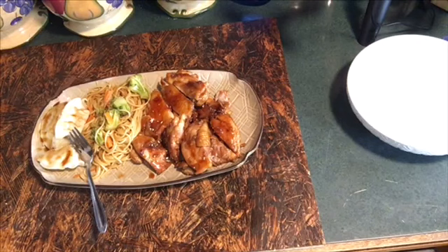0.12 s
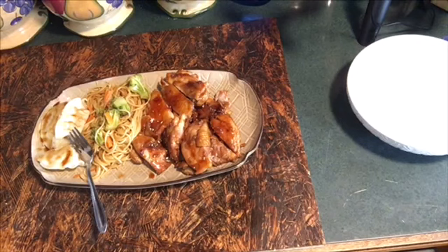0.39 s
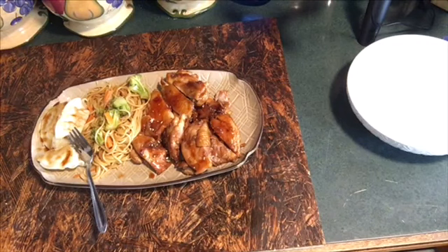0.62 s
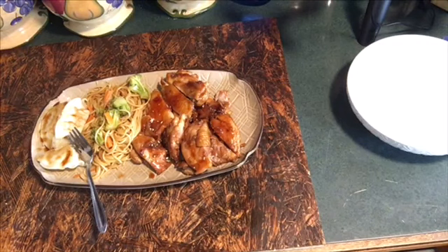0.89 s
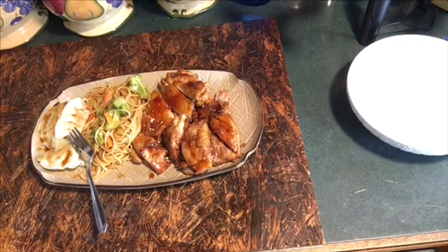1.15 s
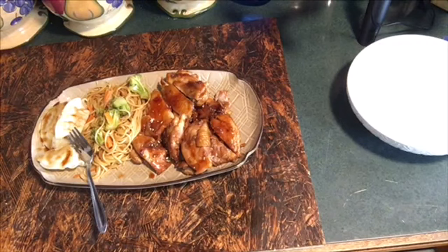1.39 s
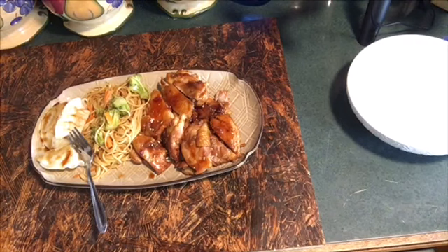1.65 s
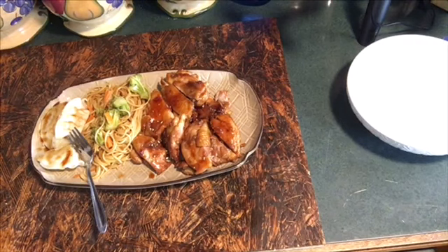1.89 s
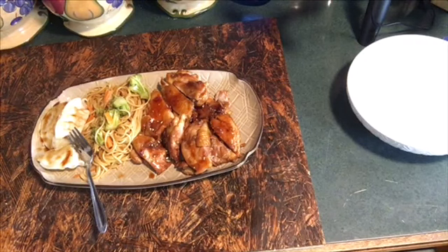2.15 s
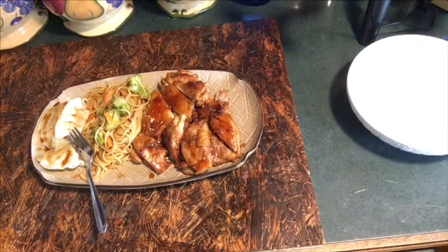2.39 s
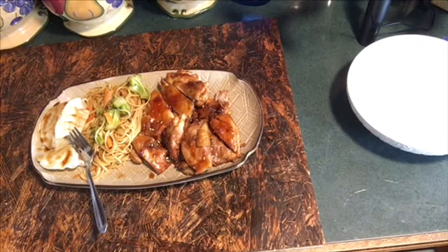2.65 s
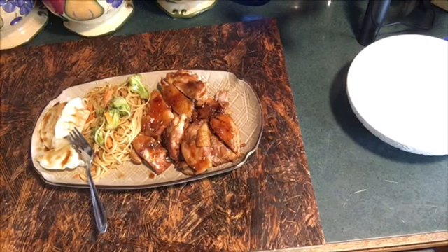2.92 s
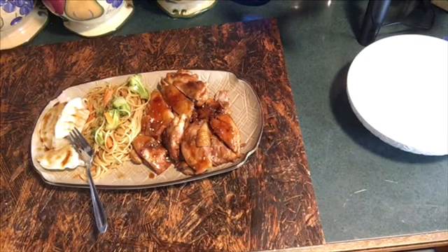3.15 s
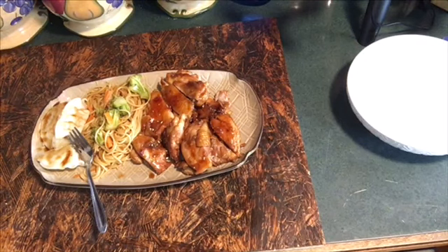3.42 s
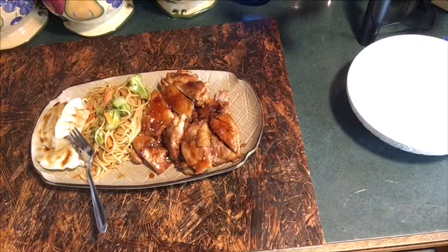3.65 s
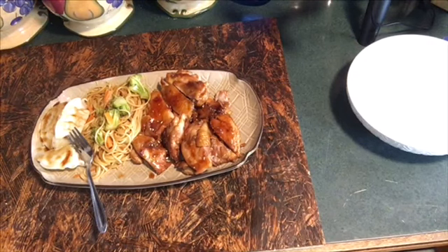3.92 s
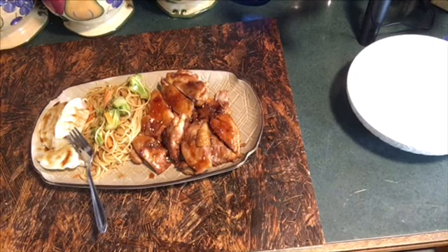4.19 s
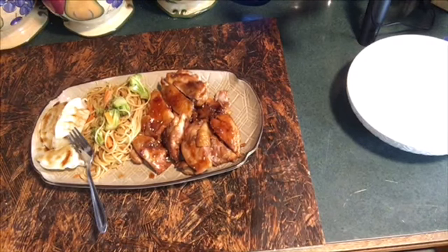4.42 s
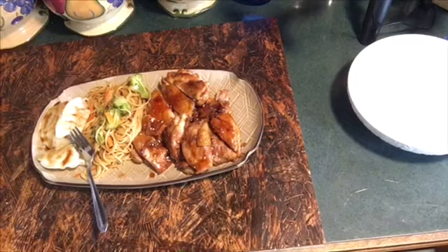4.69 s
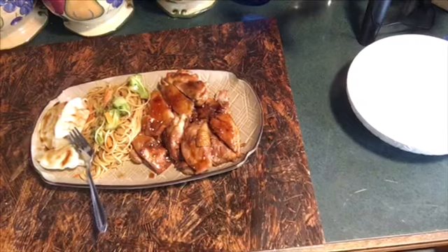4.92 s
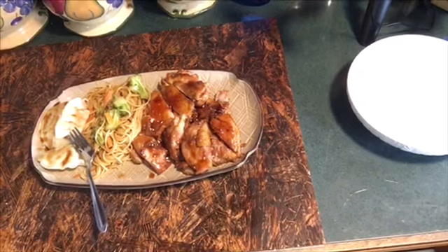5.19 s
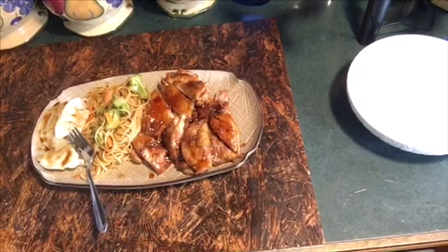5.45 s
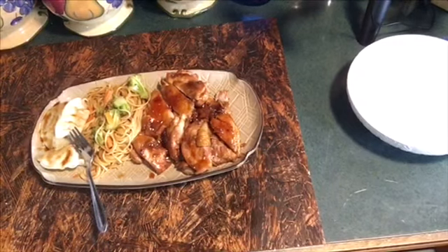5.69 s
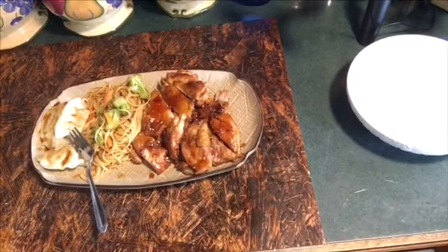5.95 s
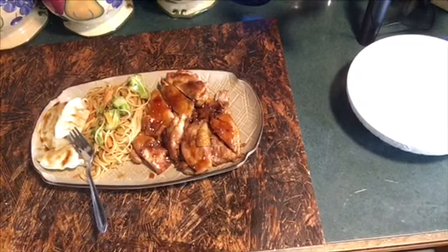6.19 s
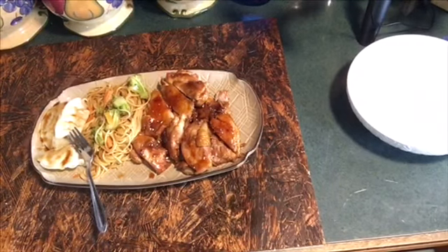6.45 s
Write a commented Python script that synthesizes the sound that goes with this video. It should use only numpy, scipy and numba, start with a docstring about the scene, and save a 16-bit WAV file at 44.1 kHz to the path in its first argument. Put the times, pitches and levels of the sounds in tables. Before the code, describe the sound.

In a small hard kitchen, a faint fridge hum and hiss continue throughout. Dry knocks and grainy slides on a wooden shelf grow busier, then a dish lands with a bright ceramic clack and rattle. After a short lull cutlery jingles and a drawer slams, the loudest moment, followed by bumps and another knock. Cloth softly rustles, a pot scrapes briefly and glass clinks. Heard by a phone a few steps away.

```python
"""Someone rummages in a kitchen cupboard a few steps from a phone, over the hum of a fridge. Knocks and
slides come first, with a faint clink of glass; then a dish is set down, cutlery jingles and a drawer slams.
Cloth rustles, a pot scrapes and the glass clinks again. Knocks are shaped bursts of noise, slides are
filtered grainy noise, and struck things are fading tones. A small hard room rings after each contact."""
import sys
import numpy as np
from scipy import signal
from scipy.fft import rfft, irfft
from scipy.io import wavfile
from scipy.ndimage import uniform_filter1d
from numba import njit

SR = 44100
rng = np.random.default_rng(int(sys.argv[2]) if len(sys.argv) > 2 else 0)


def master(y):
    """Save y as 16-bit WAV."""
    cut = np.clip(np.atleast_2d(y).T, -1, 1)
    pcm = np.round(cut * 32767)  # scale
    wavfile.write(sys.argv[1], SR, pcm.astype(np.int16))


def volts_from_decibels(level):
    """Turn decibel levels (scalar or array-like) into linear amplitude factors."""
    exponent = np.asarray(level, float) / 20
    return 10 ** exponent


N = 290178

# a hand shifting things about the shelf: (time [s], level [dB])
RUMMAGE = [(.45, -71), (1.1, -68.5), (1.3, -55), (1.47, -59.5), (1.68, -52), (1.83, -58.5), (2.05, -55.5),
           (2.46, -49), (2.5, -34.5), (2.6, -42.5), (2.75, -72)]


@njit
def svf(x, hz, sharp):
    """State-variable band-pass: lets through sound around hz, which may move, with gain 1 there."""
    y, b, l = np.empty(len(x)), 0., 0.
    for i in range(len(x)):
        g = np.tan(np.pi * hz[i] / SR)
        v = (b + g * (x[i] - l)) / (1 + g * (g + 1 / sharp))
        b, l, y[i] = 2 * v - b, l + 2 * g * v, v / sharp
    return y


def add(track, s, sound):
    """Mix a sound into the track from time s."""
    i = int(s * SR)
    track[i:i + len(sound)] += sound[:N - i]


def walk(rate):
    """A random level that slides to a new value rate times a second; its spread is near 1."""
    k = int(SR / rate)
    held = np.repeat(rng.standard_normal(N // k + 1), k)
    return 1.2 * uniform_filter1d(held, k)[:N]


def rattles(rows):
    """Short bursts of contact noise, coloured by a broad ring with chance modes, a dull body and treble."""
    contact_s, swell = 0.01261, 0.44  # fade time constant; rise time as a share of it
    sharp, mode_sharp = 1.218, 14
    out, t = np.zeros(N), np.arange(8192) / SR
    f = np.arange(4097) * SR / 8192 + 1  # Hz, kept above zero
    noises = rng.standard_normal((len(rows), 8192))
    spreads = rng.standard_normal((len(rows), 6, 1))
    for (s, db, hz, treble_db), noise, spread in zip(rows, noises, spreads):
        broad = 1 / np.hypot(1, sharp * (f / hz - hz / f)) ** 2.01
        mode_hz = hz * 2 ** (spread / 2)
        modes = 1 / (1 + 1j * mode_sharp * (f / mode_hz - mode_hz / f))
        ringing = broad * (1 + modes.sum(axis=0))
        body = volts_from_decibels(-5) / (1 + (f / 2000) ** 2.706) * f / np.hypot(f, 250)
        treble = volts_from_decibels(treble_db) * f / np.hypot(f, 4000) / (1 + (f / 7000) ** 3)
        rattle = noise * np.exp(-t / contact_s) * (1 - np.exp(-t / (swell * contact_s)))
        # roll lets the filter's short lead-in stay ahead of the contact
        sound = np.roll(irfft(rfft(rattle) * (ringing + body + treble)), 64)[:6000]
        add(out, s - 64 / SR, sound * volts_from_decibels(db) / np.abs(sound).max())
    return out


def thuds(rows, t60, rise, rough_db, jolt=0., shake_hz=100):
    """Each blow leaves one fading tone, shaken shake_hz times a second by the loose things on it."""
    out, t = np.zeros(N), np.arange(SR // 2) / SR
    chances = rng.standard_normal((len(rows), 50))
    for (s, db, hz), fade, chance in zip(rows, np.broadcast_to(t60, len(rows)), chances):
        shake = np.interp(t * shake_hz, np.arange(50), chance)
        slip = np.interp(t * shake_hz, np.arange(50), chance[::-1])
        level = volts_from_decibels(db + rough_db * shake - 60 * t / fade) * (1 - np.exp(-t / rise))
        add(out, s, level * np.sin(2 * np.pi * hz * t + jolt * slip))
    return out


def harder_is_brighter(blows, tilt_db, slope):
    """Tilt each blow in dB per octave: tilt_db for a medium blow of -40 dB, plus slope per dB of force."""
    return [(s, db, tilt_db + slope * (db + 40)) for s, db in blows]


def ring_modes(modes_hz, modes, blows, main_hz, rise, scatter_db, chatter_db, jolt, clatter_db):
    """Every blow sets all modes going, each a little differently; loose contact makes them flicker and blur."""
    out, t = np.zeros(N), np.arange(SR // 4) / SR
    hz = np.array(modes_hz)[:, None]
    mode_db, t60 = np.transpose(modes)[:, :, None]

    def wobble(part):
        return np.array([np.interp(t * 180, np.arange(60), c) for c in part])

    chances = rng.standard_normal((len(blows), len(modes), 122))
    for (s, db, tilt_db), chance in zip(blows, chances):
        start_db = db + mode_db + tilt_db * np.log2(hz / main_hz) + scatter_db * chance[:, :1]
        flicker, slip = wobble(chance[:, 2:62]), wobble(chance[:, 62:])
        phase = 2 * np.pi * hz * t + 9 * chance[:, 1:2] + jolt * slip
        tones = volts_from_decibels(start_db + chatter_db * flicker - 60 * t / t60) * np.sin(phase)
        # bright grit of edges rubbing fills in between the modes
        grit = np.diff(rng.standard_normal(len(t) + 1))
        clatter = volts_from_decibels(db + tilt_db + clatter_db - 60 * t / 0.086) * grit
        add(out, s, (tones.sum(axis=0) + clatter) * (1 - np.exp(-t / rise)))
    return out


def hush():
    """Fridge rumble and hiss of an empty room: shaped noise whose level wavers slightly."""
    # spectrum of the hush: (pitch [Hz], relative level per Hz [dB])
    spectrum = [(15, -49), (25, -12), (40, -7), (59, -2), (76, -2), (87, -12), (185, -16.5), (309, -17.5),
                (476, -24.5), (545, -22), (677, -24), (1940, -28.5), (2160, -29.5), (4030, -32.5),
                (16000, -49.5)]
    hz, db = np.transpose(spectrum)
    bins = np.arange(N // 2 + 1) * SR / N + 1
    shape = volts_from_decibels(np.interp(np.log(bins), np.log(hz), db))
    noise = irfft(rfft(rng.standard_normal(N)) * shape, N)
    return noise * volts_from_decibels(-63 + 0.28 * walk(1.6)) / noise.std()


def knocks():
    """Dry contacts: each is a brief rattle with its own pitch and brightness."""
    # contacts: (time [s], level [dB], ring pitch [Hz], treble [dB])
    contacts = [(0.366, -49, 819, -14), (0.585, -45.5, 1505, -15.5), (0.707, -48.5, 814, -49.5),
                (0.758, -41, 916.5, -51), (0.818, -48, 773, -33), (0.888, -51, 634, -26),
                (1.098, -51, 1164, -10.5), (1.147, -42.5, 1168, -24.5), (1.243, -33, 1300, -15),
                (1.276, -37, 885.3, -35), (1.362, -46.5, 842, -28), (1.501, -41, 861.5, -3.5),
                (1.566, -38, 2740, -38.5), (1.59, -30.5, 1294, -14.5), (1.631, -33.5, 1014, -55.5),
                (1.645, -33.5, 660.3, -52), (1.7, -38, 1403, -27), (1.808, -54.5, 611, -40),
                (1.858, -38, 3002, -51.5), (1.878, -37.5, 1150, -46), (2.033, -46.5, 4006, -22),
                (2.077, -36, 2958, -28), (2.088, -35.5, 881.4, -31), (2.188, -39.5, 1067, -7),
                (2.268, -41.5, 1402, -12), (2.339, -37, 1022, -21.5), (2.413, -35, 675.5, -41),
                (2.452, -33, 900.2, -50), (2.482, -18, 1700, -4), (2.568, -28, 1968, -13),
                (2.938, -52.5, 1896, -26.5), (3.496, -54, 2355, -36.5), (3.643, -41, 2940, 28.5),
                (3.954, -35.5, 1940, -3.5), (4.073, -40, 2468, -11), (4.112, -14, 227.5, -40.5),
                (4.114, -10, 1001, -6.5), (4.148, -19.5, 629.5, -20), (4.34, -41, 850, -10.5),
                (4.38, -41, 919.5, -48.5), (4.453, -38, 1326, -23), (4.486, -33, 1056, -10.5),
                (4.52, -43.5, 1520, -16), (4.727, -39, 2282, -15), (5.037, -25, 2200, -6),
                (5.051, -28.5, 1513, -22.5), (5.429, -51, 1626, -20.5), (5.539, -51, 1866, -32.5),
                (5.957, -54, 598, -36.5), (6.314, -39.5, 2010, -7), (6.479, -33, 3300, -20),
                (6.52, -32, 720, -13), (6.53, -27, 1900, -17.5)]
    return rattles(contacts)


def slide():
    """Grainy friction: dense small slips through a broad resonance, for the rummaging and single drags."""
    # single drags and rustles: (start [s], end [s], start level [dB], end level [dB], brightness [Hz])
    drags = [(1.235, 1.4, -48, -68.5, 2202), (1.582, 1.768, -46, -60, 2400), (3.5, 3.962, -63.5, -51, 2238),
             (3.954, 4.09, -37, -45, 1314), (4.297, 4.904, -48, -58.5, 1156)]
    t = np.arange(N) / SR
    out = np.zeros(N)
    slips = rng.standard_normal(N) * volts_from_decibels(4.1 * walk(60) + 2.777 * walk(400))
    # the shelf underneath drones along, more under dull heavy things than bright light ones
    wood = svf(slips[::-1].copy(), np.full(N, 300.), 1.23)
    moves = [(*np.transpose(RUMMAGE), 1150)]
    moves += [((s0, s1), (db0, db1), hz) for s0, s1, db0, db1, hz in drags]
    for s, db, hz in moves:
        fade = np.clip(np.minimum(t - s[0], s[-1] + .05 - t) / .03, 0, 1)
        centre = np.full(N, 1. * hz)
        rub = svf(svf(slips, centre, 0.975), centre, 0.975)
        out += fade * volts_from_decibels(np.interp(t, s, db)) * (rub + (2000 / hz) ** 2 * wood)
    return out


def jostles():
    """Small things knocked at random moments, with a force that follows the rummaging hand."""
    count, low_hz, octaves, treble_db = 70, 398, 3.0065, -30
    s, db = np.transpose(RUMMAGE)
    when, pitch, force = rng.random((count, 3)).T
    at = s[0] + when * (s[-1] - s[0])
    # most stay near the hand's level, a few are much louder
    level_db = np.interp(at, s, db) + 3.5 + 2 * np.log(1 / (1 - force))
    return rattles([(a, d, low_hz * 2 ** (octaves * p), treble_db) for a, d, p in zip(at, level_db, pitch)])


def wooden_tones(rows):
    """Wood answers each blow with a short, slightly unsteady tone."""
    return thuds(rows, 0.0954, rise=0.003, rough_db=3.5, jolt=.6)


def shelf():
    """The cupboard shelf: where it is struck favours its low or its high modes."""
    # modes of the shelf: (pitch [Hz], relative level [dB])
    modes = [(257, -1.5), (290, -2.5), (388, -2)]
    # blows on it: (time [s], level [dB], tilt [dB per octave])
    blows = [(0.524, -49.5, 8), (0.628, -51, 0.5), (0.697, -54, 0.5), (0.76, -42.5, 0),
             (0.825, -51.5, 20.5), (0.901, -43.5, -17), (1.144, -46.5, 13.5), (1.247, -45, 11.5),
             (1.28, -36.5, 8), (1.312, -40, -1.5), (1.336, -41.5, 10.5), (1.375, -43, -3),
             (1.418, -45.5, -3), (1.499, -44, -21.5), (1.545, -45.5, -21.5), (1.568, -43.5, 7.5),
             (1.59, -37.5, -23), (1.638, -35.5, -42), (1.66, -37, -38.5), (1.682, -41, -37.5),
             (1.718, -45, -31), (1.743, -45, -28.5), (1.832, -45, 14.5), (1.802, -45.5, 19.5),
             (1.864, -43, -27), (2.09, -42.5, 26.5), (2.349, -41.5, -31), (2.421, -46.5, 25),
             (2.461, -38.5, 15), (2.542, -42, -13)]
    middle_hz = modes[1][0]
    rows = []
    for s, db, tilt_db in blows:
        rows += [(s, db + mode_db + tilt_db * np.log2(hz / middle_hz), hz) for hz, mode_db in modes]
    return wooden_tones(rows)


def glass():
    """A clinked glass: each blow rings a handful of short high modes."""
    # pitches of its modes: (pitch [Hz])
    mode_hz = [2990, 3600, 4016, 4301, 5223, 5399, 6056, 9518, 14490]
    # the same modes: (relative level [dB], time to fade by 60 dB [s])
    modes = [(-19, 0.044), (-16, 0.043014), (-18, 0.03094), (-15.5, 0.0479), (3.5, 0.054), (4.5, 0.047),
             (-17, 0.0898), (-12, 0.1716), (-26.5, 0.089)]
    # blows: (time [s], level [dB])
    blows = [(1.679, -54.5), (6.482, -46), (6.522, -36), (6.534, -35.5)]
    tilted = harder_is_brighter(blows, tilt_db=-10.5, slope=0.591)
    return ring_modes(mode_hz, modes, tilted, main_hz=5320.0, rise=0.002, scatter_db=4.0, chatter_db=4.0,
                      jolt=0.8, clatter_db=-29.0)


def short_rings():
    """Short unsteady rings, mostly of dishes, near one pitch each."""
    # rings: (time [s], level [dB], pitch [Hz])
    rows = [(1.682, -47, 2717), (1.705, -43, 2704), (1.735, -45, 2686), (1.76, -48, 2698),
            (2.59, -27, 2660), (2.652, -30, 2668), (2.678, -35, 2667), (2.755, -49, 2673),
            (4.385, -42.5, 935.3)]
    return thuds(rows, 0.095, rise=0.005, rough_db=4.5, jolt=.5, shake_hz=120)


def booms():
    """Floor and cupboard body answer with deep fading tones."""
    # booms: (time [s], level [dB], pitch [Hz], time to fade by 60 dB [s])
    rows = [(2.07, -41, 74.8, 0.337), (2.499, -44, 60, .34), (3.99, -38.5, 56.6, 0.22),
            (4.114, -13, 58.66, 0.179), (4.39, -39, 101.8, 0.274), (4.499, -31, 45.96, 0.33),
            (5.04, -40, 57.4, 0.306), (5.101, -34, 57.4, 0.29)]
    return thuds([b[:3] for b in rows], [b[3] for b in rows], rise=0.003, rough_db=2.5)


def dish():
    """A dish set down: repeated blows ring its many modes."""
    # pitches of its modes: (pitch [Hz])
    mode_hz = [2444, 2780, 2821, 4500, 5055, 5556, 5819, 6200, 6410, 6593, 6630, 7262, 7940, 8253, 8511,
               9119, 9286, 10010, 11000, 11750, 13080, 13610, 14870, 15490]
    # the same modes: (relative level [dB], time to fade by 60 dB [s])
    modes = [(-13.5, 0.0437), (5.5, 0.0754), (-12, 0.0672), (-11, 0.005), (-23, 0.1267), (-13, 0.1854),
             (-7, 0.1158), (-11, 0.3375), (-8, 0.2525), (3, 0.1141), (6.5, 0.0836), (-13.5, 0.05),
             (-16.5, 0.12), (-14, 0.1867), (-7, 0.1253), (-3.5, 0.09), (-8, 0.0763), (-22.5, 0.1733),
             (-4, 0.0756), (-8.5, 0.07), (-10, 0.14), (-6.5, 0.08), (-16.5, 0.19), (-9, 0.1121)]
    # blows: (time [s], level [dB])
    blows = [(2.48, -21.5), (2.487, -14.5), (2.514, -36), (2.569, -20.5), (2.589, -27.5), (2.628, -36),
             (2.655, -36), (2.68, -38.5), (2.723, -44), (2.79, -52.5)]
    tilted = harder_is_brighter(blows, tilt_db=-18.5, slope=0.411)
    return ring_modes(mode_hz, modes, tilted, main_hz=2758, rise=0.004, scatter_db=1.5, chatter_db=2.5,
                      jolt=0.2, clatter_db=-24)


def cutlery():
    """Jingling cutlery: uneven, flickering high modes with plenty of grit between them."""
    # pitches of its modes: (pitch [Hz])
    mode_hz = [2600, 2977, 4130, 4530, 4328, 5884, 6078, 6379, 6940, 7391, 8183, 9238, 9814, 10990, 11360,
               11870, 13180, 13930, 14330, 14850, 15130]
    # the same modes: (relative level [dB], time to fade by 60 dB [s])
    modes = [(-6.5, 0.07565), (-7, 0.065), (-5, 0.067), (-8.5, 0.09676), (-1, 0.0645), (-3, 0.06898),
             (-6.5, 0.11), (-11, 0.23), (-10, 0.1376), (-19, 0.68), (-4.5, 0.087), (-8, 0.212),
             (-12.5, 0.26), (2.5, 0.065), (-10, 0.11), (-7.5, 0.15757), (-17.5, .06), (-9, 0.12),
             (-26.5, 0.088), (-14, 0.13), (-8, 0.14)]
    # blows: (time [s], level [dB])
    blows = [(3.597, -62), (3.632, -45), (3.642, -38), (3.659, -36.5), (3.688, -42), (3.74, -54),
             (3.813, -48), (3.826, -43), (3.911, -47), (3.962, -47), (4.14, -44), (4.175, -47),
             (4.215, -55.5), (4.706, -48.5), (4.715, -53.5), (4.975, -60)]
    tilted = harder_is_brighter(blows, tilt_db=3.5, slope=0.35)
    return ring_modes(mode_hz, modes, tilted, main_hz=5900, rise=.008, scatter_db=4, chatter_db=4.5,
                      jolt=1.2, clatter_db=-7)


def drawer():
    """The drawer front rings at one pitch, 241 Hz, loudest when it slams."""
    # blows: (time [s], level [dB])
    blows = [(4.044, -46.5), (4.114, -13.5), (4.155, -22.5), (4.401, -33), (4.842, -47.5), (5.041, -36),
             (6.483, -47.5), (6.537, -35.5)]
    return wooden_tones([(s, db, 241) for s, db in blows])


def chirps():
    """Short chirps, a rising squeak and the low tone of the glass clink: brief tones, roughened fast."""
    # chirps: (time [s], level [dB], pitch [Hz])
    rows = [(4.64, -52, 5617), (5.883, -57.5, 5670), (5.96, -51, 3250), (5.975, -54, 3466),
            (6.535, -38, 777.4), (6.553, -37.5, 782.7)]
    return thuds(rows, .04, rise=0.003, rough_db=4, jolt=1.5, shake_hz=600)


def rustle():
    """A soft rustle of cloth: smooth broad noise that swells and fades."""
    # the rustle: (start [s], end [s], level [dB], brightness [Hz])
    cloth = (6.0, 6.5, -61.5, 3997.5)
    start, end, db, hz = cloth
    swell = np.sin(np.pi * np.clip((np.arange(N) / SR - start) / (end - start), 0, 1))
    return volts_from_decibels(db) * swell * svf(rng.standard_normal(N), np.full(N, 1. * hz), 0.48)


def scrape():
    """A pot scraped along the shelf: uneven slips ring its few resonances."""
    # the scrape: (start [s], end [s], start level [dB], end level [dB])
    stroke = (6.33, 6.46, -52, -54)
    # resonances of the pot: (pitch [Hz], half width [Hz], relative level [dB])
    pot = [(1330, 91.9, -3), (1680, 75.8, -1.5), (1966, 98.3, -4), (2570, 70, -4.5), (2740, 54.1, -3.5)]
    t = np.arange(N) / SR
    start, end, start_db, end_db = stroke
    db = np.interp(t, (start, end), (start_db, end_db))
    fade = np.clip(np.minimum(t - start, end - t) / 0.01548, 0, 1)
    slips = rng.standard_normal(N) * volts_from_decibels(db + 2.4 * walk(200)) * fade
    slips = svf(slips, np.full(N, 1900.), 0.913)
    out = np.zeros(N)
    for hz, width, mode_db in pot:
        # a narrow resonance lets less noise through, so it is raised
        gain = volts_from_decibels(mode_db) * np.sqrt(SR / 2 / width)
        out += gain * svf(slips, np.full(N, 1. * hz), hz / width / 2)
    return out / 3


@njit
def walls(x, lags, scatter, gain, damp, sway, sway_hz):
    """Allpasses feed sixteen cross-fed, dulling delays, which drift slowly and blur the room's tones."""
    line, near, soft, out = np.zeros((16, 4096)), np.zeros((3, 2048)), np.zeros(16), np.zeros(len(x))
    for i in range(len(x)):
        v, total = x[i] + 1e-18, 0.
        for k in range(3):
            old = near[k, (i - scatter[k]) & 2047]
            near[k, i & 2047] = v + .6 * old
            v = old - .6 * near[k, i & 2047]
        for k in range(16):
            late = sway * (1 + np.sin(2 * np.pi * sway_hz[k] * i / SR + k))
            whole = int(late)
            part = late - whole
            newer = line[k, (i - lags[k] - whole) & 4095]
            older = line[k, (i - lags[k] - whole - 1) & 4095]
            echo = newer * (1 - part) + older * part
            soft[k] += (1 - damp) * (gain[k] * echo - soft[k])
            total += soft[k]
            out[i] += soft[k] * (1 - 2 * (k % 2))
        for k in range(16):
            line[k, i & 4095] = v * (1 - 2 * (k // 2 % 2)) + soft[k] - total / 8
    return out


def room(near):
    """A small hard room: echoes between the walls that fade within about half a second."""
    # echo paths between the walls: (delay [samples])
    lags = np.array([241, 383, 547, 727, 937, 1171, 1433, 1733, 1999, 2281, 2557, 2851, 3137, 3433, 3719, 4001])
    # short paths that scatter the sound first: (delay [samples])
    scatter = np.array([37, 83, 149])
    t60_s, sway_s = 0.4548, .00025
    gain = volts_from_decibels(-60 * lags / SR / t60_s)
    sway_hz = 1.5 * (1 + rng.random(len(lags)))
    return walls(near, lags, scatter, gain, 0.05, sway_s * SR, sway_hz)


def scene():
    """All contacts sound once directly and again off the walls, over the hush."""
    near = knocks() + slide() + jostles() + shelf() + glass() + short_rings() + booms()
    near += dish() + cutlery() + drawer() + chirps() + rustle() + scrape()
    return (volts_from_decibels(-1) * near + volts_from_decibels(-17) * room(near) + hush())[None]


def top_cut(x):
    """Nothing passes above the cut-off."""
    return signal.sosfilt(signal.butter(12, 15900, fs=SR, output="sos"), x)


def record(dry):
    """The phone takes down the finished mix."""
    return top_cut(dry)


dry = scene()
out = record(dry)
master(out)
```